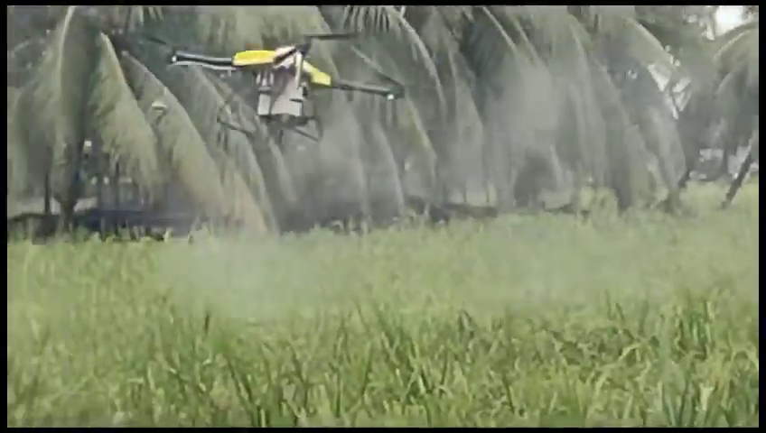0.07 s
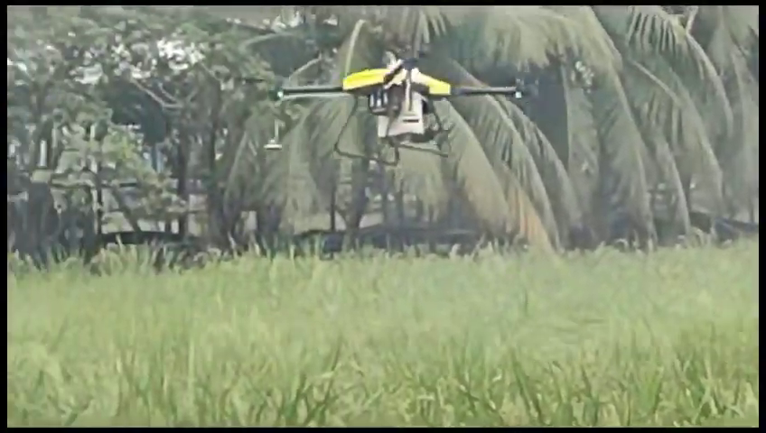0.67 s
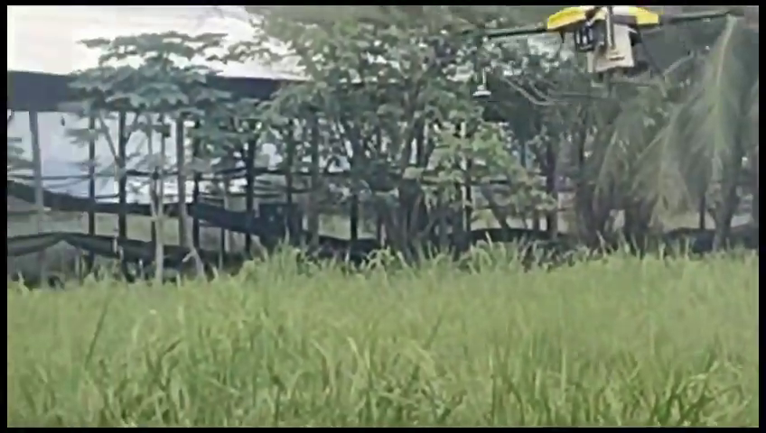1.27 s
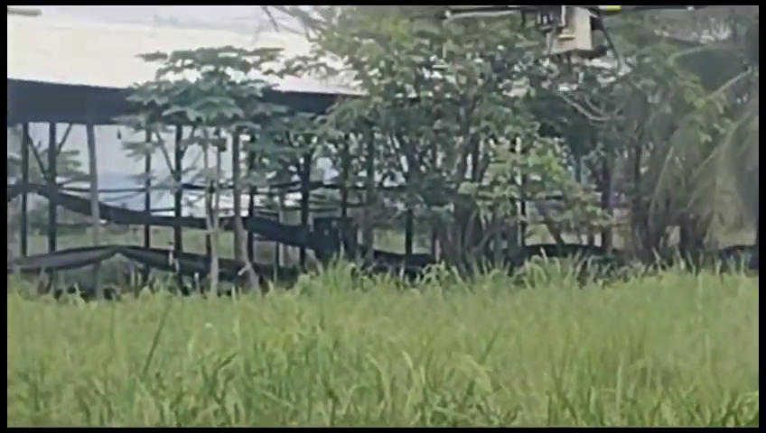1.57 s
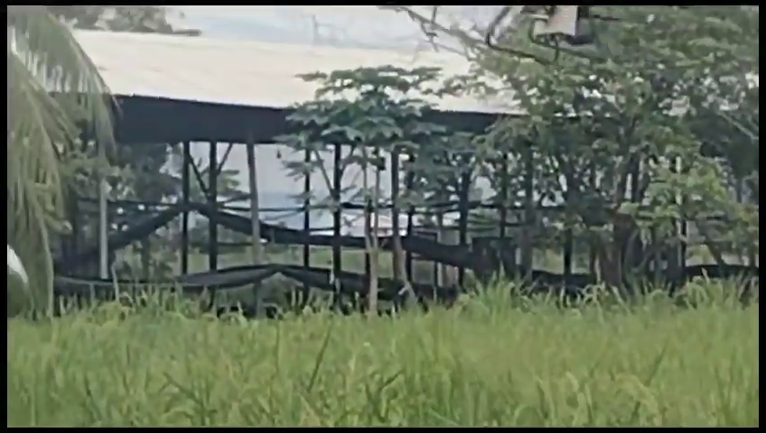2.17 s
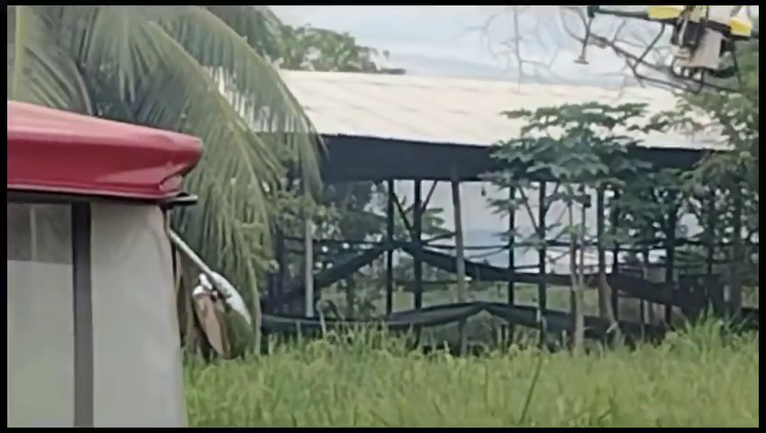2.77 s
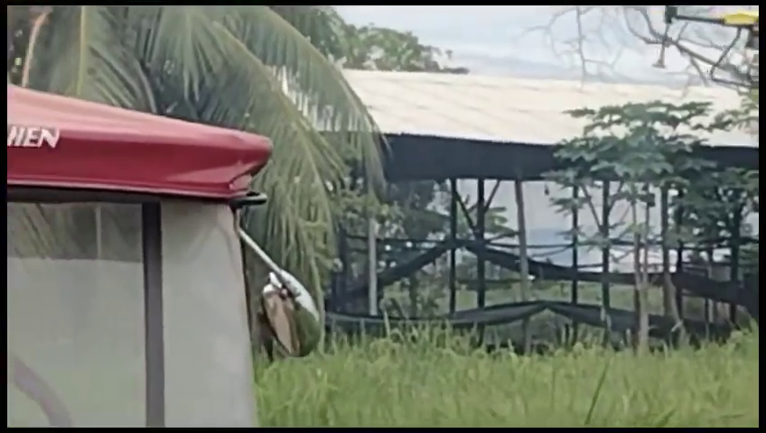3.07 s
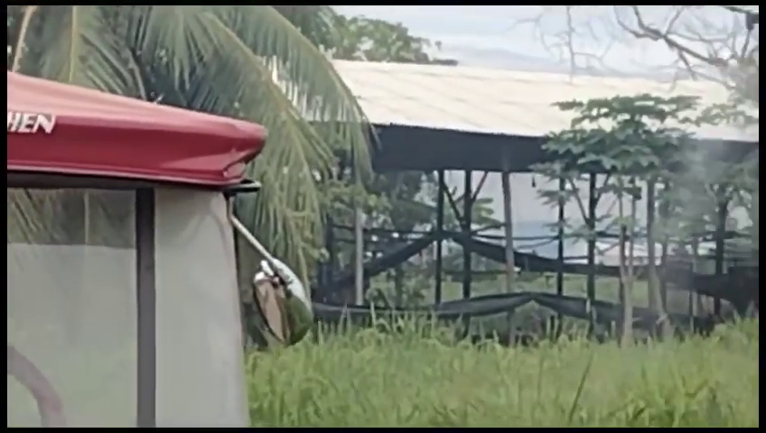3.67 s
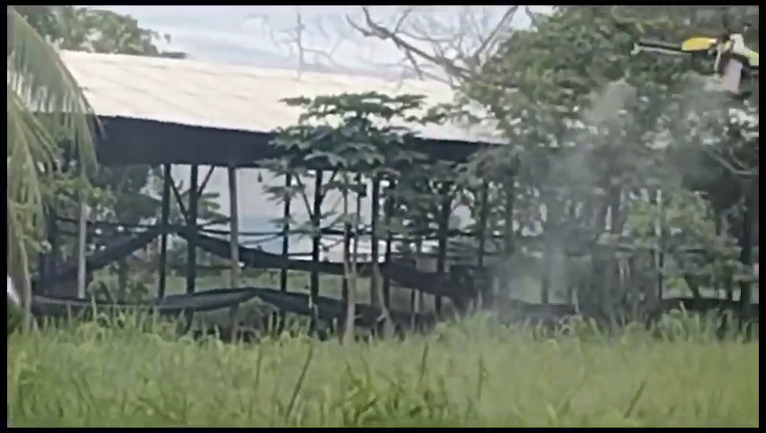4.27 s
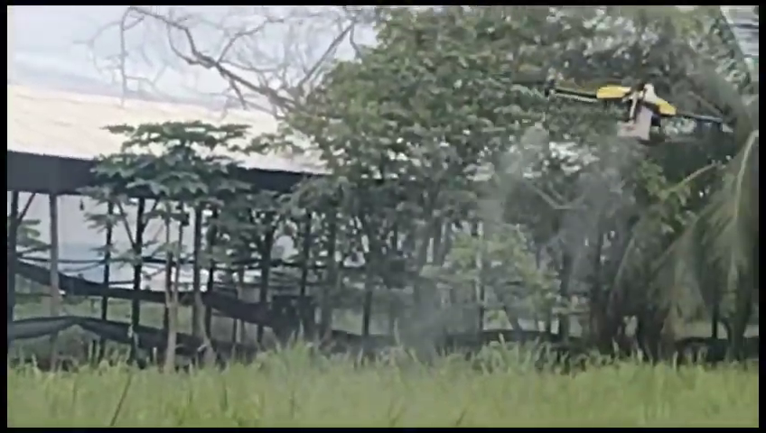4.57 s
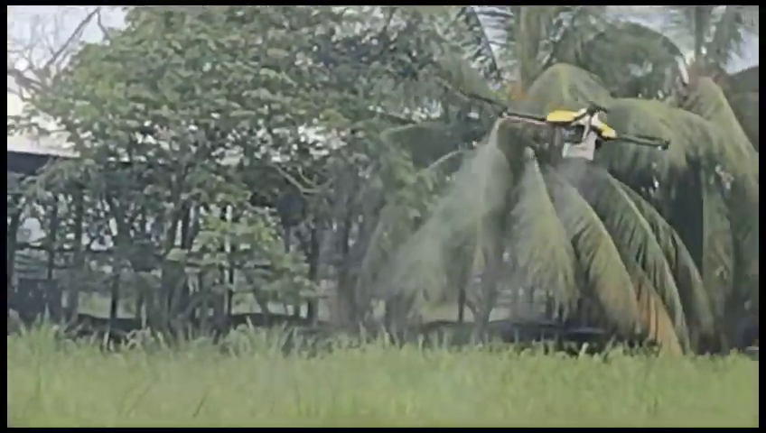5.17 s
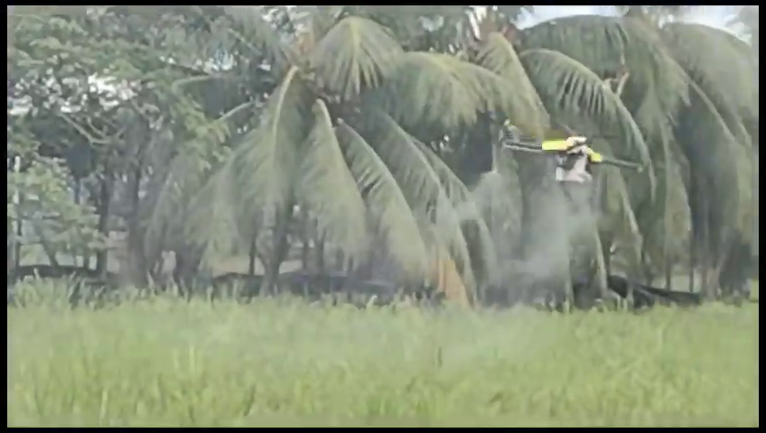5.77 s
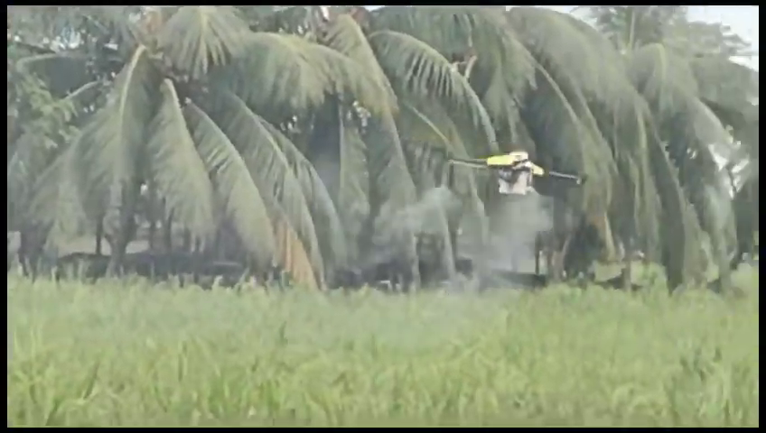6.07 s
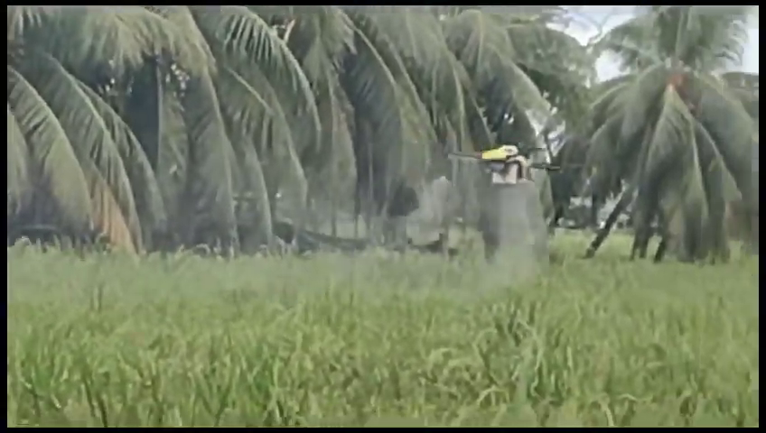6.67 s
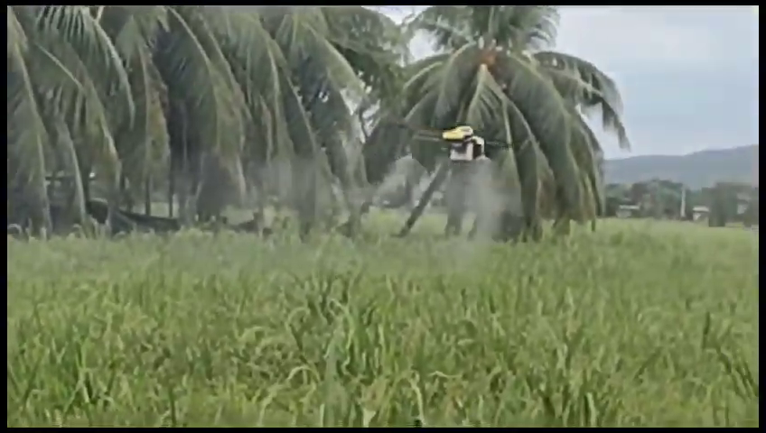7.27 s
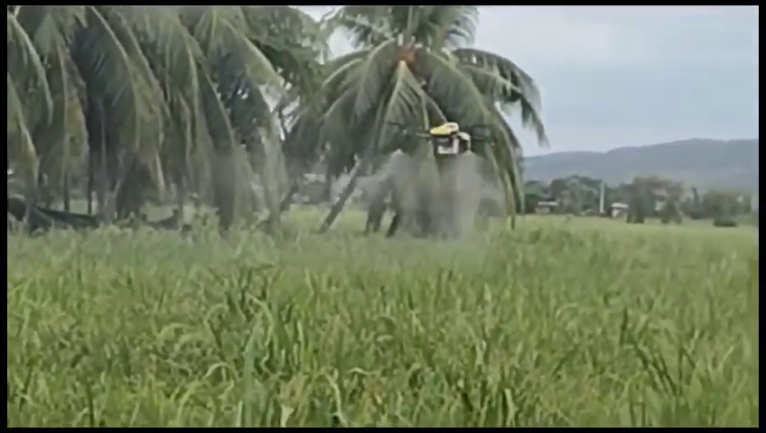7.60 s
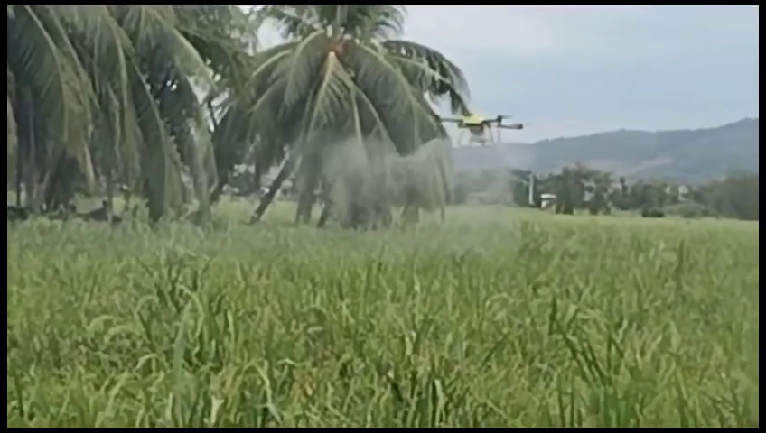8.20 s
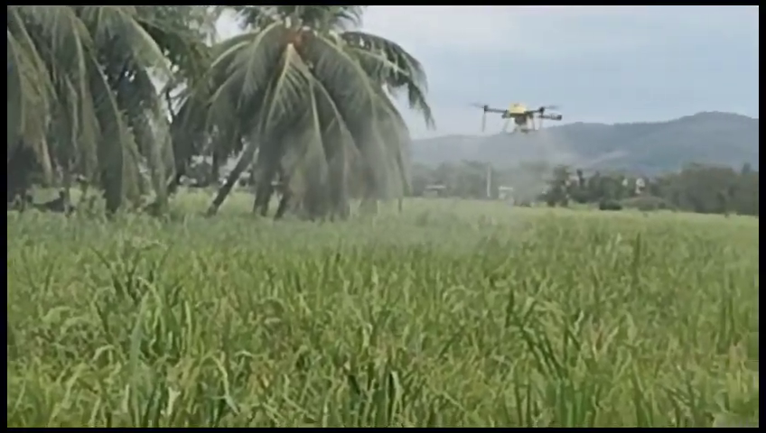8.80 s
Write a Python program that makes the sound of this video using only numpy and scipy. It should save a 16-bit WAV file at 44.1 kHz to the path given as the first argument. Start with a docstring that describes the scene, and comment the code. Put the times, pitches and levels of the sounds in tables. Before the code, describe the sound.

From the start, a small generator runs close by outdoors, slightly to the left, with a rapid, even thudding, clattering metal panels and a thin alternator whine. It holds the same speed for the whole nine seconds or so. Above it, a spray drone flies over a field, its four rotors making a wavering hum, a wide, bright, fluttering hiss and a low roar of air. The rotors rev briefly at about 0.6 seconds. Soft low tones swell near 0.4, 1.4 and 2.1 seconds. Several brief, high motor whistles come in the first two seconds, with fainter ones around 3.4 and 6.7 seconds. A very high, faint whine comes and goes between about 1 and 6 seconds. From around 3 seconds the drone slowly moves away, its hum and hiss softening, with a small rise in pitch near 6.4 seconds. Both machines are still running at the end.

```python
"""A small generator thuds and clatters close by, under the bright, fluttering hiss of a spray drone.
Its single cylinder holds a governed speed, ringing muffler, casing and panels; its alternator whines.
The drone crosses a rice field and slowly moves away. Its four rotors hum, chop the air into hiss and
push down a low roar; the motors add a thin whine and brief whistles. Soft low tones swell early on."""
import sys
import numpy as np
from scipy import signal
from scipy.fft import rfft, irfft
from scipy.io import wavfile
from scipy.ndimage import uniform_filter1d

SR = 44100
rng = np.random.default_rng(int(sys.argv[2]) if len(sys.argv) > 2 else 0)


def unload_audio(sound):
    """Save the sound as a 16-bit wav file, at the path given as the first command line argument."""
    columns = np.transpose(np.atleast_2d(sound))
    # keep every value between -1 and 1, then stretch to whole-number steps
    steps = np.round(np.clip(columns, -1, 1) * 32767)
    wavfile.write(sys.argv[1], SR, steps.astype(np.int16))


N = 389844

# exhaust note, casing tones and, at the top, the alternator's thin whine:
# (multiple of the firing rate, relative level/dB)
ENGINE_PARTIALS = [(1, -33.0), (2, -28.0), (3, -44.0), (4, -41.5), (5, -30.0), (6, -64.0), (7, -45.5),
                   (8, -38.6), (9, -48.5), (10, -47.0), (11, -48.5), (12, -52.5), (17, -57.5), (18, -56),
                   (20, -58.5), (22, -56.0), (24, -54.0), (26, -52.0), (28, -57.0), (29, -52.5),
                   (30, -51.5), (31, -50.5), (32, -51.5), (34, -58.0), (35, -58.5), (36, -59.0),
                   (37, -53.0), (38, -57.5), (39, -57.5), (48, -58.5), (84, -58.5)]
# valve and piston knocks: (place in the engine cycle 0-1, relative level/dB)
ENGINE_KNOCKS = [(0.2, -10), (0.3, -20), (0.68, -14.5), (.84, -13)]
# casing panels rung by the knocks: (f/Hz, width/Hz, relative level/dB)
PANEL_MODES = [(718, 48, -4), (788.4, 17, 3), (927, 61, 0.5), (1125, 35, -3.5)]
# throttle, as the blade rate of the fast rotor pair: (t/s, f/Hz)
THROTTLE = [(0, 98.5), (.42, 96), (.62, 110.5), (.8, 98), (1.0, 103), (1.7, 92), (3.4, 101), (4.1, 97.6),
            (5.5, 99), (6.4, 110), (7.6, 103), (8.84, 100)]
# tones of one rotor: (multiple of the blade rate, relative level/dB)
ROTOR_PARTIALS = [(1, 0), (2, -14), (3, -7), (4, -6), (5, -13), (6, -4), (7, -7), (8, -8), (9, -6),
                  (10, -16), (12, -23)]
# the drone's colour on the way in and out: (f/Hz, approaching gain/dB, leaving gain/dB)
FLYBY_EQ = [(240, 3, 2.5), (386, 3, -2), (466, 3, -0.5), (1270, 1, 0.5), (1860, -2, 0), (2380, 0, 0),
            (2900, -5.5, -3), (3360, -1.5, 4.5), (3620, 2, 0.5), (4230, 0.5, 0.5), (7500, -1, -1),
            (13000, 0.5, 0)]
# how alike the air noise is left and right: (f/Hz, correlation)
STEREO_LIKENESS = [(100, 1), (500, 0.66), (900, 1), (1400, 0.29), (1950, 0.41), (2500, 0.15), (3300, 0.33),
                   (4500, 0.083), (7000, 0.067), (13000, 0.042)]
# how much earlier the air noise arrives on the left: (t/s, lead/ms)
LEFT_LEAD = [(0, -0.047), (.75, -0.11), (1.3, 0.065), (3.5, 0.036), (4.7, 0.095), (7, 0.21), (8.84, 0.27)]
# colour of the blade hiss: (f/Hz, relative left level/dB, relative right level/dB)
HISS_SPECTRUM = [(1050, -50, -21), (1520, -10.5, -8), (2000, -12, -13), (2270, -5.5, -4.5), (2860, -8, -8),
                 (3550, -15.5, -1), (3870, -12, -9), (4700, -13.5, -11.5), (5720, -15, -8),
                 (6880, -10.5, -1.5), (7460, -13.5, -2.5), (8390, -19, -10), (9300, -21.5, -17),
                 (14700, -25.5, -25)]
# envelope of the blade hiss: (t/s, relative level/dB)
HISS_ENVELOPE = [(0, -23.5), (0.4, -25.1), (0.6, -22.5), (0.8, -25.8), (1.15, -27.9), (1.45, -26.3),
                 (1.7, -26.9), (2.0, -25.1), (2.42, -27.7), (2.9, -27.8), (3.6, -30.0), (4.55, -28.0),
                 (5.2, -31.3), (5.35, -28.8), (6.08, -30.5), (6.42, -28.3), (6.68, -31.2), (8.84, -33.0)]
# colour of the downdraught and cooling air: (f/Hz, relative left level/dB, relative right level/dB)
WASH_SPECTRUM = [(20, -7, -10), (75, -4, -6), (100, -1, -4), (135, -5, -7), (250, -3, -6), (390, -7, -9),
                 (480, -10.5, -11.5), (660, -9, -7.5), (900, -6, -7), (1080, -10, -10.5), (1330, -15, -10),
                 (1800, -28, -28)]
# envelope of the motor drives' whine: (t/s, level/dB before flutter)
WHINE_ENVELOPE = [(0, -62), (1.4, -49), (2.8, -52), (3.6, -61), (4.75, -51), (5.1, -59), (5.7, -52),
                  (6.2, -65), (8.84, -66)]
# brief motor whistles: (t/s, f/Hz, length/s, level/dB before panning)
MOTOR_WHISTLES = [(.18, 4440, 0.093, -39), (.33, 2280, .14, -35), (.55, 4180, .08, -38),
                  (1.0, 4100, 0.12, -41), (1.45, 4500, .2, -45), (2.03, 4480, 0.1, -38),
                  (3.4, 4120, 0.36, -46), (6.68, 4034, .17, -45)]
# low swells: (t/s, f/Hz, length/s, level/dB before panning)
LOW_SWELLS = [(0.39, 222, 0.27, -34.5), (1.378, 218, 0.14, -33.5), (2.14, 262, 0.13, -35.5)]

FIRING_HZ, EXHAUST_PARTIALS = 30.182, 12  # the remaining partials are the casing's and the alternator's
CLOSEST_S, CLOSEST_M, SPEED_M_PER_S = 1.2, 18, 4.5  # the drone flies a straight line
CRUISE_BLADE_HZ = 100


def amp(db):
    """Decibels to gain."""
    return 10 ** (np.asarray(db) / 20)


def unit_rms(x):
    """Scales to rms 1."""
    return x / np.sqrt(np.mean(x ** 2) + 1e-20)


def follow(rows, at):
    """Each column of a curve, interpolated along the first."""
    points, *columns = np.transpose(rows)
    return [np.interp(at, points, c) for c in columns]


def spectrum_at(rows, hz):
    """Each column of a spectrum at the frequencies hz, on a log scale."""
    f, *columns = np.transpose(rows)
    return [np.interp(np.log(hz + 1), np.log(f + 1), c) for c in columns]


def clock():
    """Time of every sample in seconds."""
    return np.arange(N) / SR


def drift(rate_hz, hop=128):
    """Smooth random wobble of rms 1 that rolls off above rate_hz."""
    count = N // hop + 2
    hz = np.fft.rfftfreq(count, hop / SR)
    slow = irfft(rfft(rng.standard_normal(count)) * np.exp(-(hz / rate_hz) ** 2), count)
    return np.interp(np.arange(N) / hop, np.arange(count), unit_rms(slow))


def pan(x, left_db):
    """Places a sound left_db louder on the left than on the right."""
    return x * amp([[left_db / 2], [-left_db / 2]])


def engine_turns(hunt_cycles=.012, hunt_hz=1.3, jitter_cycles=.0015):
    """Running count of engine cycles; the governor hunts slowly and no two firings are quite alike."""
    return FIRING_HZ * clock() + hunt_cycles * drift(hunt_hz) + jitter_cycles * drift(10)


def exhaust(turns, trim_db=-0.4, left_db=5, left_lead_rad=0.27, unsteady=0.02, muffler_hz=(225, 270)):
    """The thud: each firing sends one pressure pulse ringing through the muffler."""
    orders, levels_db = np.transpose(ENGINE_PARTIALS[:EXHAUST_PARTIALS])
    # a causal pulse: its phase follows from its spectrum
    mirrored_db = np.interp(abs(np.fft.fftfreq(64, 1 / 64)), orders, levels_db)
    phase = -signal.hilbert(np.log(amp(mirrored_db))).imag
    out = np.zeros((2, N))
    for k, db in zip(orders, levels_db):
        # odd orders come from combustion alone, a fifth of a turn ahead of the crankshaft's even ones
        angle = 2 * np.pi * k * turns + phase[int(k)] + 2 * np.pi / 5 * (k % 2)
        angle -= np.interp(k * FIRING_HZ, muffler_hz, [0, np.pi])  # the resonance flips higher overtones
        width = min(1, 2 / k)  # widest in the deep bass
        tone = amp(db) * np.cos([angle + left_lead_rad * width, angle])
        out += pan(tone, left_db * np.sqrt(width))
    return np.sqrt(2) * amp(trim_db) * out * (1 + unsteady * drift(12))


def casing_and_alternator(turns):
    """The casing rings and, at the top, the alternator's slots whine; the highest tones waver most."""
    out = np.zeros((2, N))
    for k, db in ENGINE_PARTIALS[EXHAUST_PARTIALS:]:
        waver = np.interp(k, [32, 48], [.35, .9])
        strength = unit_rms(1 + waver * drift(9))
        tone = amp(db) * strength * np.cos(2 * np.pi * (k * turns + rng.random()))
        out += pan(tone, left_db=np.interp(k, [16, 18, 34, 48, 69], [-1, -3.0, 2.5, -17, 15]))
    return np.sqrt(2) * out


def clatter(turns, level_db=-43, decay_cycles=0.062):
    """Valves and piston knock at the same places in every cycle and ring the panels."""
    envelope = sum(amp(db) * np.exp(-((turns - place) % 1) / decay_cycles) for place, db in ENGINE_KNOCKS)
    knocks = envelope * rng.standard_normal(N)
    panels = sum(amp(db) * signal.lfilter(*signal.iirpeak(hz, hz / width, fs=SR), knocks)
                 for hz, width, db in PANEL_MODES)
    return amp(level_db) * unit_rms(panels)


def rotor_turns(pair_lag=.005, lean_lag=.13, lean_s=4.9, lean_width_s=2.5):
    """Running blade counts of four rotors; one pair slows, most as the drone leans into its run."""
    t = clock()
    fast = follow(THROTTLE, t)[0]
    lean = np.exp(-((t - lean_s) / lean_width_s) ** 2)
    slow = fast * (1 - pair_lag - lean_lag * lean)
    # the flight controller keeps trimming the speeds
    rates = [fast] + [hz * (1 + .012 * drift(1.2)) for hz in (slow, fast, slow)]
    return [np.cumsum(hz * (1 + .0035 * drift(9))) / SR for hz in rates]


def flight_db(t, power, fade):
    """Rotor noise grows with a power of the blade rate and falls with distance (fade 1 = open air)."""
    throttle = follow(THROTTLE, t)[0] / CRUISE_BLADE_HZ
    metres = np.hypot(CLOSEST_M, SPEED_M_PER_S * (t - CLOSEST_S))
    return 20 * (power * np.log10(throttle) - fade * np.log10(metres / CLOSEST_M))


def flyby_eq_db(t, hz):
    """The drone changes colour as it comes near, passes and sinks towards the horizon."""
    approach_db, leaving_db = spectrum_at(FLYBY_EQ, hz)
    return approach_db * np.interp(t, [1.1, 2.1], [1, 0]) + leaving_db * np.interp(t, [3, 7.5], [0, 1])


def rotor_hum(rotors, base_db=-37, flutter_db=2.2, notch_hz=530, notch_width_hz=58, notch_db=13.5):
    """Blade tones flutter in the disturbed air; the echo off the field cuts a narrow notch in them."""
    out, t = np.zeros(N), clock()
    for turns, rotor_db in zip(rotors, (0, -6, -10, -11)):  # the nearest rotor is loudest
        blade_hz = np.gradient(turns) * SR
        for k in range(1, 13):
            dip_db = notch_db * np.exp(-((k * blade_hz - notch_hz) / notch_width_hz) ** 2)
            tone_db = follow(ROTOR_PARTIALS, k)[0] + flyby_eq_db(t, k * blade_hz.mean()) - dip_db
            gain = amp(tone_db + rotor_db + flutter_db * drift(7.9))
            out += gain * np.cos(2 * np.pi * (k * turns + rng.random()))
    return unit_rms(out) * amp(base_db + flight_db(t, power=3.5, fade=.9))


def turbulence(spectrum, colour_db, patchy_db, frame):
    """Stereo air noise of rms 1, shaped by a spectrum, by colour_db(t, hz) and by random patches."""
    step = frame // 4
    t = np.arange(N // step + 5)[:, None] * step / SR
    hz = np.fft.rfftfreq(frame, 1 / SR)
    a, b, c, d, patches = rng.standard_normal((5, len(t), len(hz)))
    left, unrelated = a + 1j * b, c + 1j * d
    likeness = spectrum_at(STEREO_LIKENESS, hz)[0]
    delay = np.exp(-2j * np.pi * hz * follow(LEFT_LEAD, t)[0] / 1000)
    right = likeness * left * delay + np.sqrt(1 - likeness ** 2) * unrelated
    patches = uniform_filter1d(patches, size=14, axis=0)  # smooth in time
    patches = unit_rms(uniform_filter1d(patches, size=12, axis=1))  # and in frequency
    shape_db = np.array(spectrum_at(spectrum, hz))[:, None] + colour_db(t, hz) + patchy_db * patches
    frames = np.array([left, right]) * amp(shape_db)
    _, noise = signal.istft(frames.swapaxes(1, 2), nperseg=frame, noverlap=frame - step)
    return unit_rms(noise[:, :N])


def blade_hiss(rotors, trim_db=0.5, chop=0.065, sharpness=2.6, flicker_db=0.13):
    """Air tears off the blade edges, with a swish as each blade swings towards the listener."""
    def colour_db(t, hz):
        # below about 4 kHz the hiss partly follows throttle and distance instead of its envelope
        offset_db = -29.5 + flight_db(t, power=3.6, fade=0.2) - follow(HISS_ENVELOPE, t)[0]
        share = np.interp(hz, [1500, 2600, 3380, 5660], [0.25, 0.34, 0.18, 0.054])
        return offset_db * share + flyby_eq_db(t, hz)
    pulses = [np.exp(sharpness * np.cos(2 * np.pi * turns)) for turns in rotors]
    swish = unit_rms(sum(unit_rms(signal.detrend(pulse)) for pulse in pulses))
    db = trim_db + follow(HISS_ENVELOPE, clock())[0] + flicker_db * drift(16)
    return amp(db) * turbulence(HISS_SPECTRUM, colour_db, patchy_db=1.0, frame=512) * (1 + chop * swish)


def air_wash(level_db=-36.0):
    """One low roar for the drone's downdraught and the generator's cooling air."""
    def colour_db(t, hz):
        share = np.interp(hz, [100, 500], [0.77, 1])  # the bass follows the flight a little less
        return flight_db(t, power=0.4, fade=0.23) * share + flyby_eq_db(t, hz)
    return amp(level_db) * turbulence(WASH_SPECTRUM, colour_db, patchy_db=1.96, frame=2048)


def drive_whine(start_hz=14160, sag_hz_per_s=50, spacing_hz=370, flutter_db=2):
    """The motor drives' switching tone and two weaker neighbours sink slowly, fluttering on each side."""
    out, t = np.zeros((2, N)), clock()
    top_hz = start_hz - sag_hz_per_s * t
    db = follow(WHINE_ENVELOPE, t)[0]
    for steps_down, tone_db in [(0, 0), (1, -7), (1.6, -9)]:
        hz = top_hz - steps_down * spacing_hz + 15 * drift(2) + 6 * drift(30)
        tone = np.cos(2 * np.pi * np.cumsum(hz) / SR)
        out += tone * amp(db + tone_db + flutter_db * np.array([drift(12), drift(12)]))
    return out


def brief_tones(rows, left_db, waver_rad):
    """Wavering tones that swell and fade: motor whistles up high, soft swells down low."""
    out, t = np.zeros(N), clock()
    for peak_s, hz, length_s, db in rows:
        envelope = amp(db) * np.exp(-(2 * (t - peak_s) / length_s) ** 2)
        out += envelope * np.cos(2 * np.pi * hz * t + waver_rad * drift(42))
    return pan(out, left_db)


def scene():
    """The generator close by and the drone over the field."""
    engine, rotors = engine_turns(), rotor_turns()
    generator = exhaust(engine) + casing_and_alternator(engine) + clatter(engine)
    motors = drive_whine() + brief_tones(MOTOR_WHISTLES, left_db=-7, waver_rad=0.6)
    air = blade_hiss(rotors) + air_wash() + brief_tones(LOW_SWELLS, left_db=1, waver_rad=0.41)
    return generator + rotor_hum(rotors) + motors + air


def record(dry):
    """A steep low-pass takes off the very top."""
    lowpass = signal.firwin(301, cutoff=14350, window=("kaiser", 9), fs=SR)
    return signal.oaconvolve(dry, lowpass[None], "same")


dry = scene()
out = record(dry)
unload_audio(out)
```